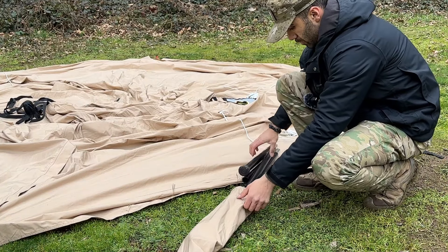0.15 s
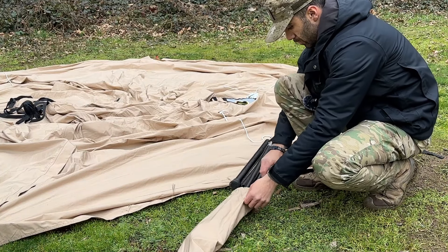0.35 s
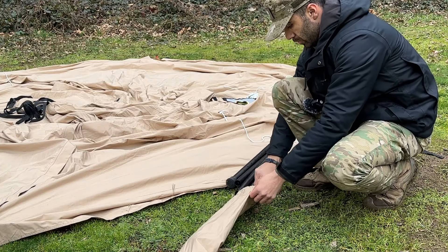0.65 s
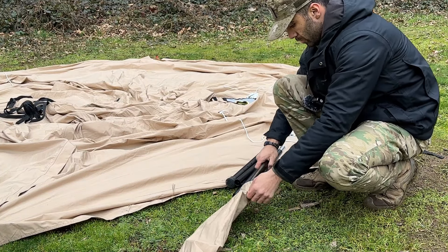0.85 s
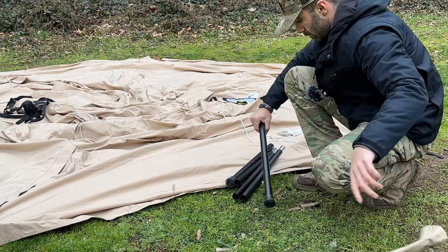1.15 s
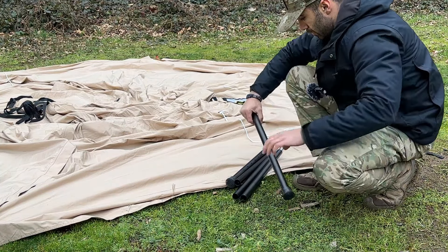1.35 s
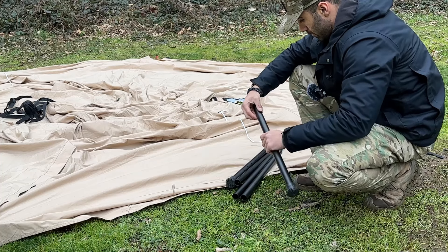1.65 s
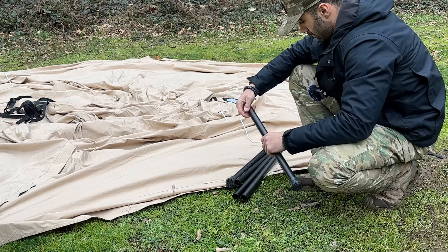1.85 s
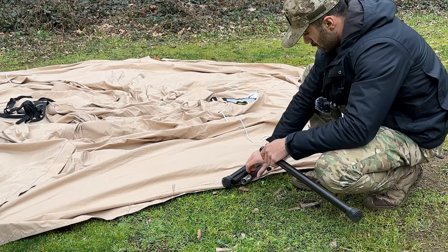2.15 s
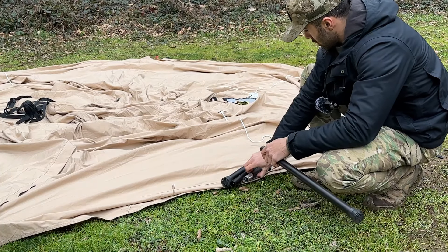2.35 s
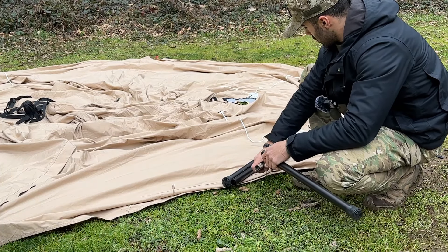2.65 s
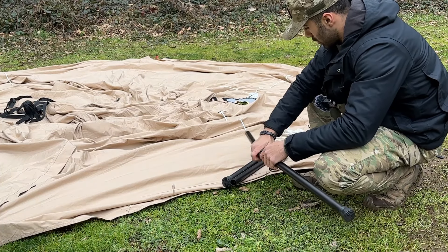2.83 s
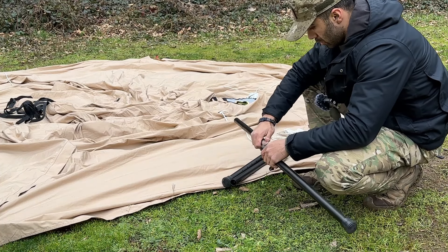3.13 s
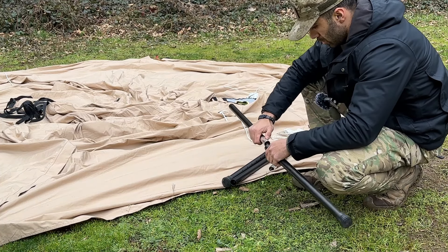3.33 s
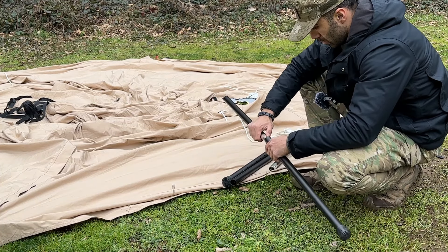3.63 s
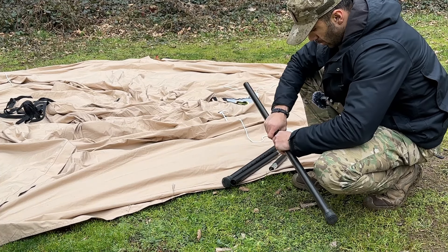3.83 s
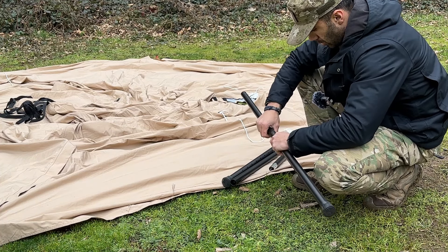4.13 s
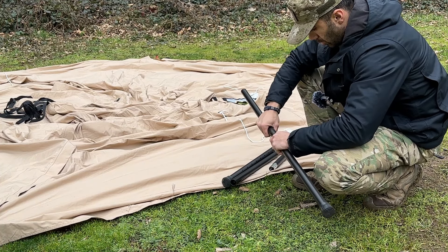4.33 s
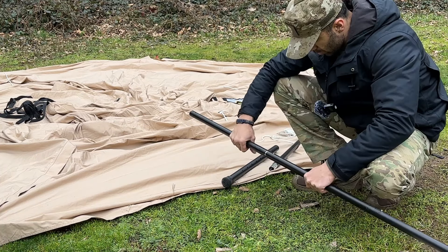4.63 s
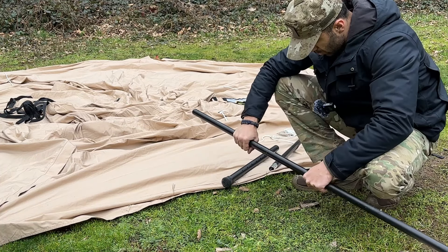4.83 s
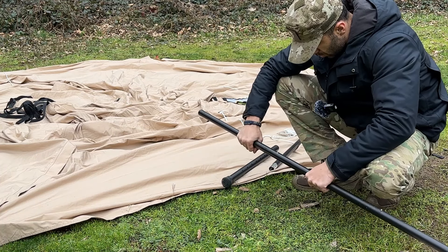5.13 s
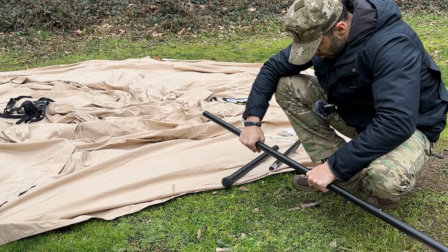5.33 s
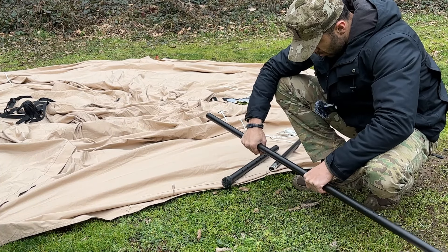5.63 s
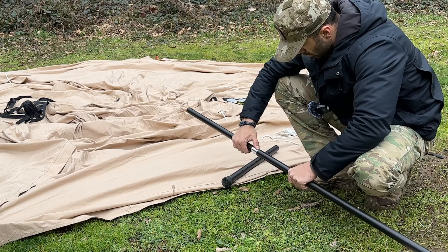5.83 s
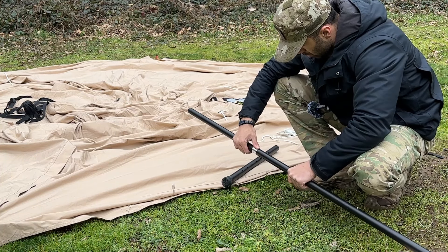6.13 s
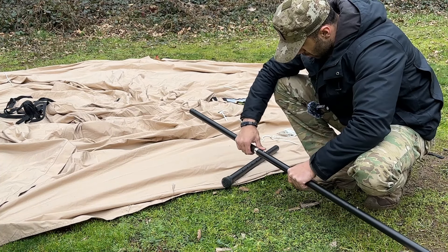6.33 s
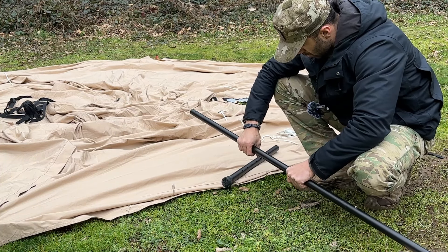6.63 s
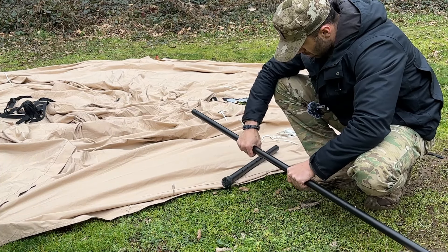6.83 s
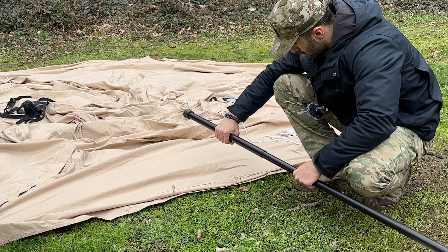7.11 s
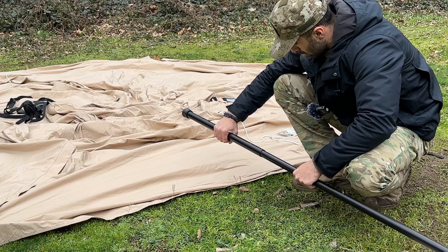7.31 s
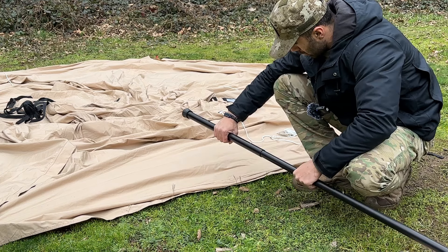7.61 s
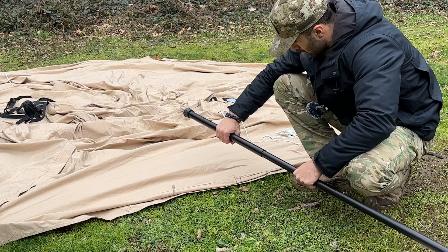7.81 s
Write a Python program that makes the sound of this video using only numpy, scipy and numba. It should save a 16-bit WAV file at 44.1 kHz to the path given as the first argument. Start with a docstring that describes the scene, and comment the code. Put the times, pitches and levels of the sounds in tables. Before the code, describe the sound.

Close up outdoors, a canvas bag is tugged off metal tubes with a brisk rustle, and the tubes clink and scrape together. A cloth stroke, a second brief clatter and light sliding follow. Then pole sections are joined with separate hard metallic cracks, short and damped by the hands, the loudest slightly overloading the microphone. Faint garden noise lies behind.

```python
"""Tent poles joined on a lawn

Steel pole sections slide out of a canvas bag, clink together and are pushed into one another.
Loose tubes are banks of decaying modes driven by knocks and sliding; held tubes crack as noise bursts,
with damped modes, a short wall ring and the odd overtones of the capped air column inside.
Cloth is filtered noise with soft snaps; the quiet garden is drifting noise, wind and gliding bird whistles.
Loud clicks overload the microphone, and the whole level dips briefly a few times."""
import sys
import numpy as np
from scipy import signal
from scipy.fft import rfft, irfft
from scipy.io import wavfile
from scipy.ndimage import uniform_filter1d
from numba import njit

SR = 44100
rng = np.random.default_rng(int(sys.argv[2]) if len(sys.argv) > 2 else 0)


def amplitude_ratio(level_db):
    """Convert a level in decibels to the matching linear amplitude (field) ratio."""
    exponent = np.asarray(level_db, float) / 20
    return 10 ** exponent


def to_wav(sig):
    """Store sig (one row per channel, or 1-D mono) as 16-bit WAV at the path in sys.argv[1].

    Samples outside -1..1 are clipped; the rate is SR.
    """
    pcm = np.clip(np.atleast_2d(sig), -1, 1) * 32767
    pcm = np.round(pcm).astype(np.int16)
    wavfile.write(sys.argv[1], SR, pcm.T)  # frames by channels


N = 351477  # length [samples]

# spectrum of the far garden noise: (frequency [Hz], relative level [dB])
GARDEN_SPECTRUM = [(15, -47.5), (25, -20), (92, 0), (137, -4), (263, 1), (394, -4), (677, -17),
                   (1480, -17.5), (5430, -26), (7920, -35.5), (14400, -37), (16000, -40)]
# wind on the microphone: (time [s], level [dB])
WIND_LEVEL = [(0.0, -64), (0.77, -76), (1.4, -79), (3.51, -81), (3.73, -71.5), (4.37, -73), (4.95, -55),
              (5.13, -71), (6.55, -73.5), (7.19, -75.5), (7.97, -87)]
# far bird notes: (time [s], length [s], start frequency [Hz], end frequency [Hz], level [dB])
BIRD_NOTES = [(4.573, .06, 5800, 4070, -63), (4.70, 0.057, 4200, 5800, -65.5),
              (5.231, .08, 7260, 6270, -67.5), (5.492, .2, 5000, 4840, -70),
              (7.781, 0.016, 3620, 3530, -41)]
# steady rustle of canvas and sleeves: (time [s], 2-8 kHz level [dB], level over 8 kHz relative to it [dB])
STEADY_RUSTLE = [(0, -40, -14.5), (0.3, -50, -14.5), (0.95, -53.5, -14.5), (1.18, -64, -14.5),
                 (1.66, -57, -6.5), (1.92, -64, -4.5), (2.86, -52, -10.5), (3.15, -53, -10.5),
                 (3.45, -60.5, -11.5), (3.95, -60, -10), (4.33, -70, -9), (4.6, -72.5, -4),
                 (5.0, -68.5, -11.5), (5.6, -71.5, -11.5), (5.85, -75.5, -3.5), (6.45, -80, -2.5),
                 (6.6, -72, -21), (6.95, -69.5, -9.5), (7.4, -71.5, -17.5), (7.97, -81.5, -17.5)]
# single tugs and strokes of bag, cloth, sleeve or sliding hand:
# (peak time [s], swell [s], fade [s], 2-8 kHz level [dB], level under 2 kHz relative to it [dB])
CLOTH_STROKES = [(0.13, .04, 0.073, -35, 3.5), (0.23, .02, .04, -40.5, 8.5), (0.51, 0.036, .06, -44, 11.5),
                 (0.6, .06, 0.029, -53, 12), (0.69, 0.012, 0.058, -45.5, 13),
                 (1.047, 0.022, .025, -59.5, 12), (1.105, 0.025, .03, -64, 13.5),
                 (1.175, 0.022, .02, -63, 12.5), (1.25, 0.077, 0.17, -52.5, 8), (1.36, .15, .16, -38, -6),
                 (1.44, 0.1, 0.033, -47.5, 9.5), (1.56, 0.093, 0.088, -44.5, 1.5),
                 (3.85, 0.081, .01, -43.5, -18), (4.23, 0.18, 0.062, -45.5, -6.5),
                 (4.616, .15, 0.22, -56, -6), (4.955, 0.21, 0.065, -58, -17),
                 (5.358, 0.05, 0.076, -58, -23), (5.5, 0.098, .2, -62, -13.5), (5.68, .015, 0.089, -59, -5),
                 (5.83, 0.15, 0.011, -56, -2), (5.914, 0.045, .015, -49, -10),
                 (5.96, .015, 0.044, -52.5, -10), (6.454, 0.08, 0.022, -47.5, -16),
                 (6.55, .08, 0.13, -58, -4), (6.89, .08, .1, -61.5, -8), (7.4, .03, 0.1, -59, 4),
                 (7.792, .045, .015, -60, -7)]
# spectrum of rubbed cloth: (frequency [Hz], relative level [dB])
WEAVE_SPECTRUM = [(240, -46), (400, -4.5), (730, -6.5), (839, -4.5), (979, -4.5), (1730, -5.5),
                  (2930, -10.5), (4440, -6.5), (5780, -8), (11800, -19), (14800, -26), (16000, -49.5)]
# bending and wall modes of the loose tubes: (frequency [Hz], relative level [dB], t60 before touch [s])
LOOSE_MODES = [(531.5, -16.5, 0.55), (914, -14.5, 0.073), (1129, -20, 0.014), (1240, -22, 0.04),
               (1422, -6, 0.25), (1420, -9, 0.42), (1610, -23, .1), (2320, -14.5, 0.057),
               (2561, -0.5, 0.15), (2630, -2, 0.21), (2700, -11, 0.14), (2940, -18.5, 0.027),
               (3863, -9, .15), (3940, -10, .13), (5335, -9, 0.27), (5340, -9, 0.31), (5500, -15, 0.21),
               (5660, -14.5, .1), (5730, -11.5, 0.21), (5930, -15.5, .1), (6190, -8, 0.16),
               (6600, -14.5, 0.061), (6740, -7, 0.092), (7355, -5.5, 0.081), (8250, -11.5, 0.055),
               (9310, -13.5, .1), (10600, -20, 0.076), (11600, -23, 0.13), (13600, -27, .08),
               (15200, -30, .08)]
# loose tubes knocking: (time [s], relative level [dB], boost of the wall modes [dB])
KNOCKS = [(0.0885, -8.5, 4), (0.1011, 5, 7.5), (0.1148, -2.5, 3.5), (0.1292, 0, 8.5), (0.1376, -6.5, 4.5),
          (0.149, -5, 8.5), (0.1764, -4.5, 1), (0.2074, -7.5, -3), (0.2259, -6, -0.5), (0.2572, -13, -7.5),
          (0.3184, -3.5, -2), (0.3501, -1, 3.5), (0.3653, -7.5, 0), (0.379, -0.5, -1.5), (0.4198, -6, -8),
          (0.4945, -10, -8), (0.503, -11, -1), (0.635, -18, -23), (0.6781, -9.5, -5.5), (0.6889, -15.5, -1),
          (0.787, -23.5, 2), (0.8026, -13, 3.5), (0.8804, -19.5, 5), (1.9393, 0.5, 1.5), (1.952, -1.5, 5),
          (1.981, -8.5, 4), (2.0377, -9.5, 0.5), (2.0509, -13, -1), (2.2194, -40.5, 0), (2.355, -21, -1),
          (2.489, -12.5, 7), (2.5489, -22, 6.5), (2.6629, -32.5, 3), (2.742, -24.5, 4.5),
          (2.753, -19.5, -4)]
# tubes sliding along each other: (time [s], relative level [dB])
SLIDE_LEVEL = [(0.0, -33), (0.08, -36), (0.27, -39), (0.294, -52), (0.32, -36.5), (0.55, -36.5),
               (0.61, -51.5), (0.73, -41), (0.785, -48.5), (0.84, -41), (0.94, -44), (2.1, -49),
               (2.2, -62.5), (2.225, -48), (2.33, -52), (2.37, -44.5), (2.476, -53), (2.57, -35.5),
               (2.655, -54), (2.675, -45), (2.725, -40.5), (2.77, -58), (2.85, -54.5)]
# boost of the wall modes while sliding: (in the bag [dB], in the hand [dB])
SLIDE_WALL_BOOST = (0.5, 5.5)
# unringing part of knocks and slides: (frequency [Hz], relative level [dB])
GRIT_SPECTRUM = [(120, -61.5), (200, -25), (1270, -9.5), (1400, -7), (2170, -16.5), (2610, -7.5),
                 (4770, -24), (5420, -11.5), (16000, -38.5)]
# spans in which the loose tubes are silent: (start time [s], end time [s])
TUBES_SILENT = [(.941, 1.93), (2.829, 3)]
# modes of the pole gripped in two hands: (frequency [Hz], relative level [dB], t60 before the grip [s])
HELD_MODES = [(610, 1.5, .1), (1000, -6, 0.093), (1337, -1.5, 0.029), (1422, 2, 0.052), (2390, -2, 0.028),
              (2560, 2, 0.034), (2940, -11, 0.05), (3340, -6.5, 0.047), (3732, -1, 0.17),
              (3900, -4.5, 0.084), (5000, 5, 0.02), (5460, 2.5, .055), (6430, 0.5, 0.023),
              (8227, -5.5, 0.06), (15800, -3.5, .04)]
# oval ring of the wall, which no grip stops: (frequency [Hz], relative level [dB], t60 [s])
WALL_MODES = [(5400, 1.5, 0.082), (5320, -19.5, 0.26)]
# the two modes that each grip leaves free:
# (from time [s], first frequency [kHz], second frequency [kHz], relative level [dB])
FREE_MODES = [(0, 1.44, 2.4, -1.5), (3.0, 3.94, 2.57, -8.5), (3.5, 1.31, 2.4, -1), (3.8, 6.35, 2.41, -22),
              (4.3, 3.29, 1.01, -17), (4.6, 1.31, 1.44, -7), (5.3, 5.0, 14.8, -4), (6.0, 3.95, 8.25, -12),
              (6.3, 0.62, 2.94, -25), (6.7, 5.0, 6.36, -6), (7.0, 14.9, 2.93, -15)]
# capped air column as the pole grows and is gripped anew:
# (from time [s], lowest note [Hz], loudest overtone [Hz], relative level [dB])
AIR_COLUMN = [(0, 145.4, 147, -19), (3.8, 79.3, 865, -27), (4.6, 57.62, 1372, -35), (6.0, 57, 620, -30),
              (6.3, 55.9, 1047, -37), (6.7, 55.93, 765.6, -37.5), (7.0, 40.22, 856, -31.5)]
# spectrum of the metal crack: (frequency [Hz], relative level [dB])
CRACK_SPECTRUM = [(35, -53), (60, -20), (822, -18.5), (2090, -8), (2710, -13.5), (3040, -4), (3940, -15.5),
                  (5210, -2), (6900, -9.5), (7940, -14), (9350, -16.5), (13300, -17), (16000, -30)]
# joints knocking and snapping home:
# (time [s], crack level [dB], chatter [ms], brightness over 5.8 kHz [dB], relative wall ring level [dB])
JOINT_CLICKS = [(2.9703, -28, 8, -6, -10), (3.011, -36, 6, 0, -19), (3.397, -56, 4, 0, -20.5),
                (3.5506, -31.5, 4.4, -19, -27), (3.8067, -41.5, 8, 2, -6), (3.8566, -1.5, 5.9, -5, -14.5),
                (4.3544, -30, 4, 8, -32), (4.366, -8, 3.6, 5, -23), (4.965, -39, 4.6, -18.5, -22.5),
                (5.4133, -6, 2.5, 6, -22), (5.6855, -50.5, 8, -4.5, -21), (6.1817, -18.5, 2.5, 2.5, -28.5),
                (6.4395, -39, 6, 7, -5.5), (6.4665, -4, 5.6, -8, -24), (6.8008, -5.5, 4, 5.5, -13),
                (7.1907, -54, 6, -4, -5), (7.2738, -57, 3, 0.5, -11), (7.3914, -49, 6, -4, 3),
                (7.4233, -42, 2.2, 5.5, 0.5), (7.4334, -8.5, 4.4, 4.5, -10)]
# sudden dips of the whole level: (time [s], recovery [s], depth [dB])
LEVEL_DIPS = [(0.941, 0.019, -16), (3.701, 0.016, -13), (4.558, 0.017, -13), (5.836, 0.023, -12.5),
              (7.027, 0.026, -16)]


def evened(x):
    """Normalises a signal to unit rms."""
    return x / np.sqrt(np.mean(x ** 2) + 1e-20)


def read(points, hz):
    """Interpolates a spectrum on a log-frequency axis."""
    f, value = np.transpose(points)
    return np.interp(np.log(hz + 1), np.log(f + 1), value)


def curve(rows):
    """Interpolates the columns of a time table to every sample."""
    s, *columns = np.transpose(rows)
    return [np.interp(np.arange(N) / SR, s, c) for c in columns]


def coloured(x, db_of):
    """Linear filtering: multiplies the spectrum by a gain in dB over frequency."""
    return irfft(rfft(x) * amplitude_ratio(db_of(np.fft.rfftfreq(len(x), 1 / SR))), len(x))


def above(hz, edge_hz, soft=2.3):
    """Smooth high-pass weight rising from 0 to 1 around the edge."""
    return 1 / (1 + (edge_hz / (hz + 1)) ** soft)


def ring(x, hz, t60):
    """Damped resonance: a unit impulse gives a decaying sine."""
    radius, turn = 10 ** (-3 / (t60 * SR)), 2 * np.pi * hz / SR
    return signal.lfilter([0, np.sin(turn)], [1, -2 * radius * np.cos(turn), radius * radius], x)


@njit
def ring_touched(x, turn, loss):
    """Damped resonance as a rotating phasor whose pitch and damping change at every sample."""
    out, state = np.zeros(len(x)), 0j
    for i in range(len(x)):
        state = state * np.exp(1j * turn[i] - loss[i]) + x[i]
        out[i] = state.imag
    return out


def add(mix, s, sound):
    """Superposes a sound at time s."""
    part = mix[round(s * SR):][:len(sound)]
    part += sound[:len(part)]


def grains(per_s, spread_db, size):
    """Random impulse process: sparse clicks, a few of them large."""
    height = amplitude_ratio(spread_db * np.minimum(rng.exponential(1, size), 4))
    happens = rng.random(size) < per_s / SR
    return evened(height * happens * rng.choice([-1., 1.], size))


def garden():
    """Diffuse noise: far traffic and leaves as random short-time spectra with drifting patches, and wind."""
    frames, hz = N // 256 + 5, np.fft.rfftfreq(1024, 1 / SR)
    real, imaginary, patches = rng.standard_normal((frames, 513, 3)).T
    patches = uniform_filter1d(patches, 10, axis=0)  # over frequency
    patches = evened(uniform_filter1d(patches, 12, axis=1))  # over time
    spectra = (real + 1j * imaginary) * amplitude_ratio(read(GARDEN_SPECTRUM, hz)[:, None] + 1.8 * patches)
    far_noise = evened(signal.istft(spectra, nperseg=1024, noverlap=768)[1][:N])
    wind = coloured(rng.standard_normal(N), lambda f: -30. * np.log2((f + 1) / 23.0) ** 2)
    return amplitude_ratio(-55) * far_noise + amplitude_ratio(curve(WIND_LEVEL)[0]) * evened(wind)


def birds():
    """Frequency glides: the phase of each whistle is the integral of its changing pitch."""
    out = np.zeros(N)
    for s, length, start_hz, end_hz, db in BIRD_NOTES:
        hz = np.linspace(start_hz, end_hz, round(length * SR))
        whistle = np.sin(2 * np.pi * np.cumsum(hz) / SR)
        add(out, s, amplitude_ratio(db) * np.hanning(len(hz)) * whistle)
    return out


def movement():
    """Power summation of the steady rustle and every stroke gives the low, middle and high gains."""
    steady_db, top_db = curve(STEADY_RUSTLE)
    t = np.arange(N) / SR
    mid = amplitude_ratio(2 * steady_db)
    low = mid.copy()
    for s, swell, fade, db, low_db in CLOTH_STROKES:
        near = slice(max(round((s - 3 * swell) * SR), 0), round((s + 3 * fade) * SR))
        away = np.maximum((s - t[near]) / swell, (t[near] - s) / fade)
        power = amplitude_ratio(2 * (db - 19.5 * away ** 1.5))  # 19.5 dB down after one swell or fade; round top
        mid[near] += power
        low[near] += power * amplitude_ratio(2 * low_db)
    return np.sqrt(low), np.sqrt(mid), np.sqrt(mid) * amplitude_ratio(top_db)


def cloth():
    """Fibre friction: hiss with soft snaps, in three bands of the weave that follow the movement."""
    low, mid, top = movement()
    out = np.zeros(N)
    bands = ((474.3, 2000, low, 2.7), (1870, 8000, mid, 1.2), (7750, 21000, top, 1.5))
    for lo_hz, hi_hz, gain, catch_db in bands:
        # folds catch and slip
        crumple = amplitude_ratio(catch_db * evened(uniform_filter1d(rng.standard_normal(N), size=500)))
        source = crumple * rng.standard_normal(N) + 0.74 * grains(1500., 3.6, size=N)

        def band_db(f):
            share = above(f, lo_hz, 30.0) * (1 - above(f, hi_hz, 12.))
            return read(WEAVE_SPECTRUM, f) + 20 * np.log10(share + 1e-5)

        out += gain * evened(coloured(source, band_db))
    spectra = signal.stft(out, nperseg=512)[2]
    folds = rng.standard_normal(spectra.shape[::-1]).T  # each fold has its own colour for a moment
    folds = uniform_filter1d(folds, size=7, axis=0)
    folds = evened(uniform_filter1d(folds, size=12, axis=1))
    return signal.istft(spectra * amplitude_ratio(3.2 * folds - 1.25), nperseg=512)[1][:N]


def loose_tubes():
    """Modal excitation: knocks, bounces and sliding drive shared modes; touch damps and detunes them."""
    n = 3 * SR
    s, knock_db, wall_db = np.transpose(KNOCKS)
    at, t = np.round(s * SR).astype(int), np.arange(4000) / SR
    out_of_bag = round(TUBES_SILENT[0][1] * SR)
    slide_db = curve(SLIDE_LEVEL)[0][:n]
    slide_wall_db = np.where(np.arange(n) < TUBES_SILENT[0][1] * SR, *SLIDE_WALL_BOOST)

    contact, crack = amplitude_ratio(slide_db), np.zeros(n)
    for start, db in zip(s, knock_db):  # each knock bounces on for a moment
        add(contact, start, amplitude_ratio(db - 14.0) * np.exp(-t / 0.012))
        add(crack, start, amplitude_ratio(db - 16.0) * np.exp(-t / 0.00054))
    chatter = grains(900, 5.5, size=n)

    modes = np.array(LOOSE_MODES)
    # rms of the modes together under steady noise
    stored = np.sqrt(np.sum(amplitude_ratio(2 * modes[:, 1]) * modes[:, 2] * SR / (12 * np.log(10))))
    place = rng.standard_normal((len(s), 2, len(modes)))  # each knock lands elsewhere on the tubes
    steps = np.arange(0, n + 600, 600)
    out = np.zeros(n)
    for k, (hz, db, t60) in enumerate(LOOSE_MODES):
        rattle = contact * chatter * rng.standard_normal(n)
        drive = rattle * amplitude_ratio(slide_wall_db * above(hz, 4500)) / stored
        blow_db = knock_db - 14.5 + wall_db * above(hz, 3700) + 3.2 * place[:, 0, k]
        drive[at] += amplitude_ratio(blow_db) * np.sign(place[:, 1, k])
        grip, bend = (np.interp(np.arange(n), steps, rng.standard_normal(len(steps))) for _ in range(2))
        loss = np.log(1000) / (t60 * SR) * np.exp(1.5 * np.maximum(grip, -.3))
        loss[out_of_bag:] *= 1.35  # out of the bag, a hand rests on the tubes
        loss[at] += .6  # a new blow stops part of the old ring
        out += amplitude_ratio(db) * ring_touched(drive, 2 * np.pi * hz / SR * (1 + 0.0055 * bend), loss)

    def grit_db(f):
        return read(GRIT_SPECTRUM, f)

    rasp = rng.standard_normal(n) * (0.41 * contact * (1 + .5 * abs(chatter)) + crack)
    white = rng.standard_normal(n)
    out += coloured(rasp, grit_db) / np.std(coloured(white, grit_db))
    # sliding stirs the dense crowd of wall modes
    hiss = white * (1 + 0.65 * abs(chatter))
    hiss = coloured(hiss, lambda f: -np.minimum(570.0 * np.log2((f + 1) / 6000.) ** 2, 30.))
    out += amplitude_ratio(slide_db + slide_wall_db - 7.5) * evened(hiss)
    for start, end in TUBES_SILENT:
        out[round(start * SR):round(end * SR)] = 0
    return np.pad(out, (0, N - n))


def crack_burst(ms, top_db):
    """Broadband impact: a few ms of metal chatter, then a tail off ground and body."""
    t = np.arange(SR // 2) / SR
    low_db = -4.5 - 0.99 * top_db  # a dull click has more at 0.3-1.8 kHz

    def crack_db(f):
        body = above(f, 300.) * (1 - above(f, 1800))
        return read(CRACK_SPECTRUM, f) + low_db * body + top_db * above(f, 5800)

    noise = evened(coloured(rng.standard_normal(len(t)), crack_db))
    after = np.maximum(t - ms / 1000, 0)
    fall = np.exp(-t / 0.009 - after / 0.0024) + 0.07 * np.exp(-t / 0.011)
    burst = np.minimum(t / 0.00046, 1) * fall
    dulled = coloured(noise, lambda f: -14. * above(f, 9000.))  # grass swallows the treble
    return burst * noise + 0.022 * np.exp(-t / 0.019) * dulled


def held_pole(s, push, wall_db):
    """Modal damping: the wall rings on, while the hands damp all but two modes of the pole."""
    out = np.zeros(len(push))
    for hz, level_db, t60 in WALL_MODES:
        out += amplitude_ratio(wall_db + level_db) * ring(push, hz, t60)
    _, first_khz, second_khz, free_db = [row for row in FREE_MODES if row[0] <= s][-1]
    mode_hz = [row[0] for row in HELD_MODES]
    free = [min(mode_hz, key=lambda hz: abs(hz - 1000 * khz)) for khz in (first_khz, second_khz)]
    for hz, level_db, t60 in HELD_MODES:
        held_db, stretch = (0, 1.5) if hz in free else (30, 0.5)
        out += amplitude_ratio(free_db + level_db - held_db) * ring(push, hz, t60 * stretch)
    return out


def air_column(s, push, top_db):
    """Quarter-wave resonance: a pipe capped at one end sounds its odd overtones."""
    out = np.zeros(len(push))
    _, lowest, loudest, air_db = [row for row in AIR_COLUMN if row[0] <= s][-1]
    for hz in lowest * np.arange(1, 2600 / lowest, 2):
        luck = rng.standard_normal(2)
        level_db = air_db - 0.6 * top_db + 5.0 * luck[0]  # a dull click has more air
        level_db -= min(15.0 * np.log2(hz / loudest) ** 2, 24.)
        out += amplitude_ratio(level_db) * np.sign(luck[1]) * ring(push, hz, 0.13 * np.sqrt(1000 / hz))
    return out


def joint_click(s, db, ms, top_db, wall_db):
    """Impact response: the crack, plus one push halfway through it into the pole and its air."""
    push = np.zeros(SR // 2)
    push[round(ms * SR / 2000)] = 1
    sound = crack_burst(ms, top_db) + held_pole(s, push, wall_db) + air_column(s, push, top_db)
    return amplitude_ratio(db) * sound


def scene():
    """Superposition of all sources, then a common gain that drops at each dip and climbs straight back."""
    mix, t = garden() + birds() + cloth() + loose_tubes(), np.arange(N) / SR
    for row in JOINT_CLICKS:
        add(mix, row[0], joint_click(*row))
    dip_db = np.zeros(N)
    for s, length, db in LEVEL_DIPS:
        dip_db += db * np.clip(1 - (t - s) / length, 0, 1) * (t >= s)
    return (mix * amplitude_ratio(dip_db))[None]


def band_limit(x):
    """A steep low-pass at the top of the band."""
    return signal.sosfilt(signal.butter(12, 16640, fs=SR, output="sos"), x)


def record(dry):
    """Saturation and high-pass: the loudest clicks flatten at full scale; the deepest bass is cut."""
    flat = dry / (1 + abs(dry) ** 6) ** (1 / 6)
    bass_cut = signal.butter(2, 45., "high", fs=SR, output="sos")
    mix = signal.sosfilt(bass_cut, flat)
    return band_limit(mix)


dry = scene()
out = record(dry)
to_wav(out)
```